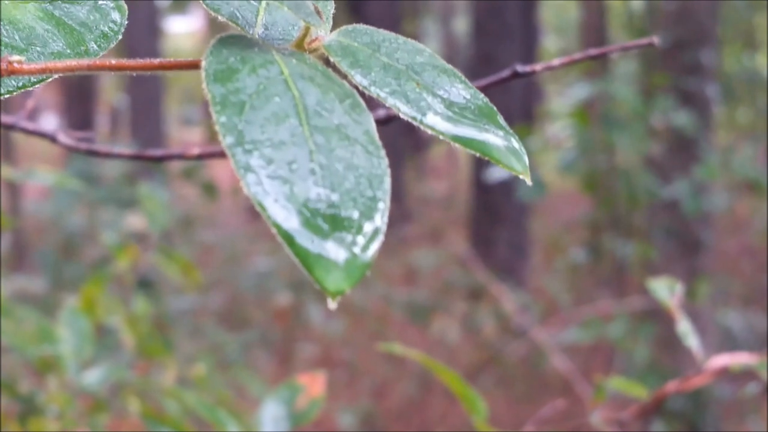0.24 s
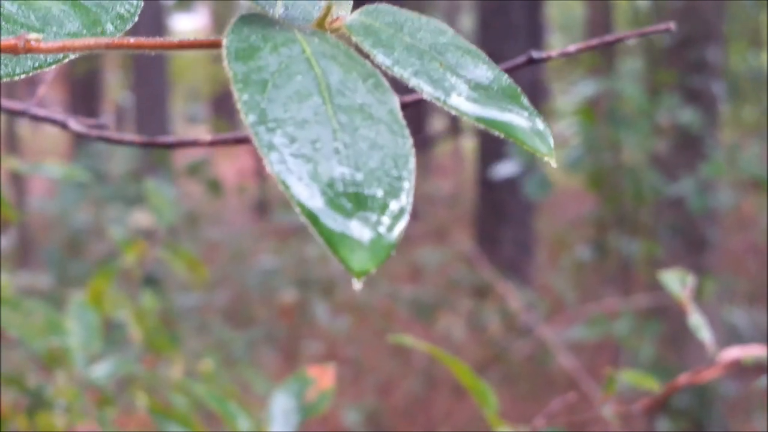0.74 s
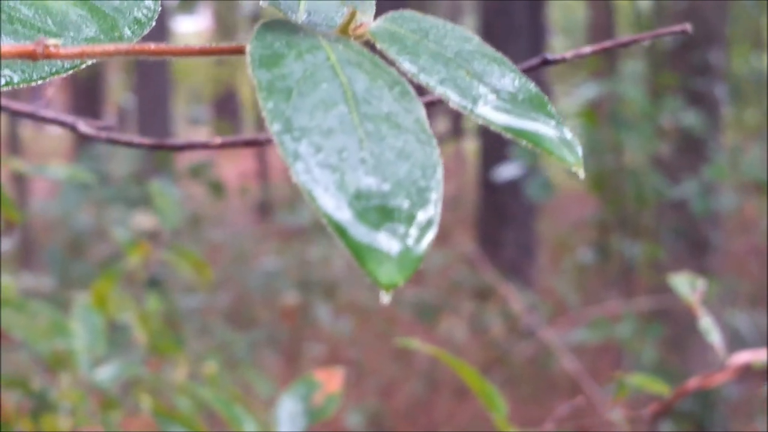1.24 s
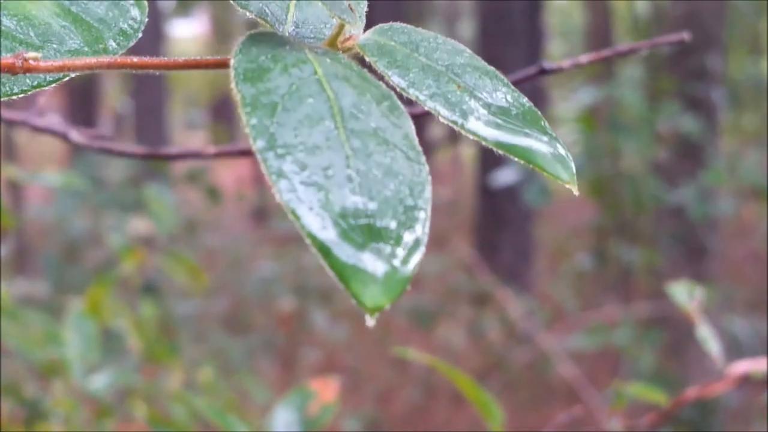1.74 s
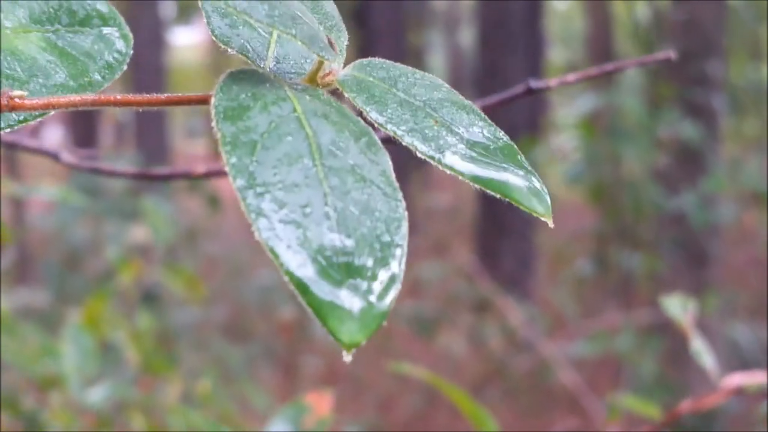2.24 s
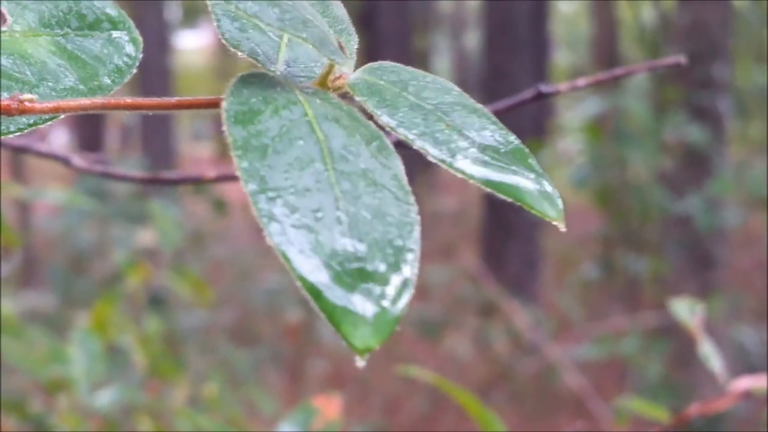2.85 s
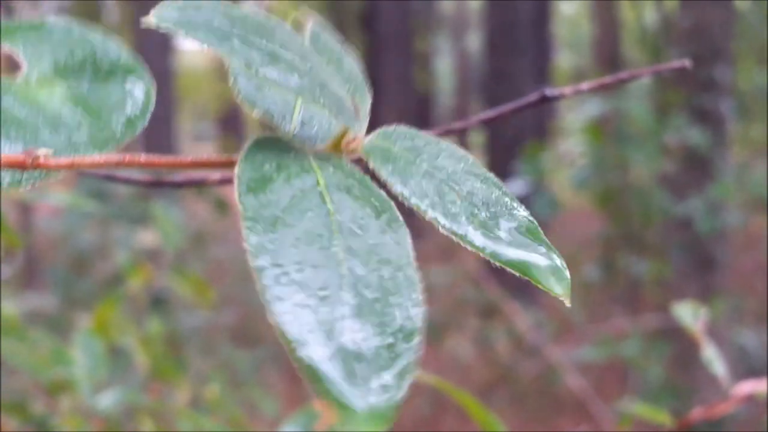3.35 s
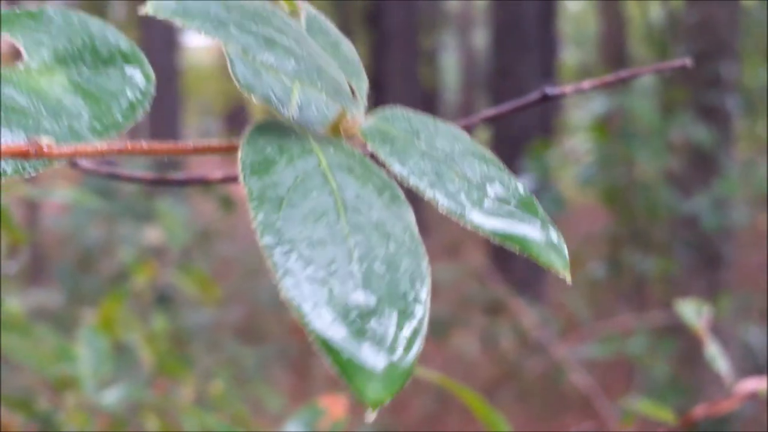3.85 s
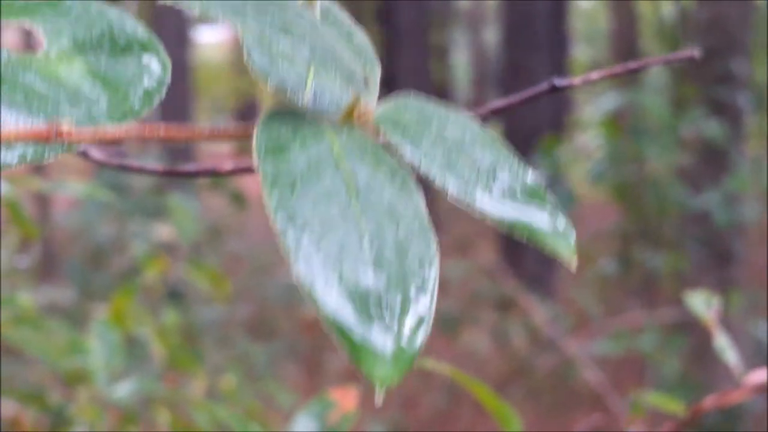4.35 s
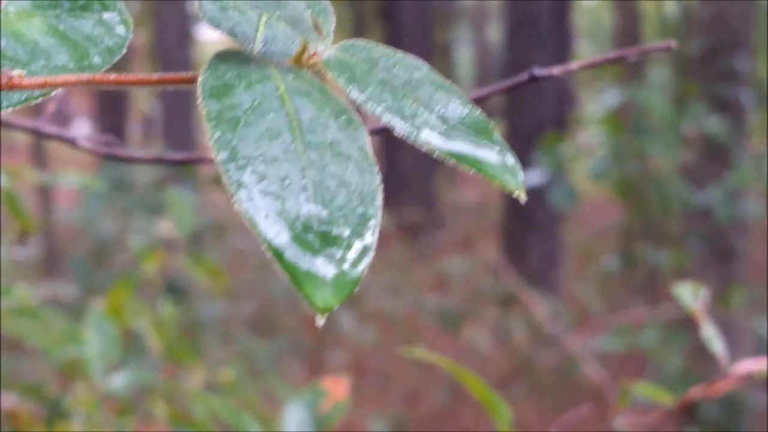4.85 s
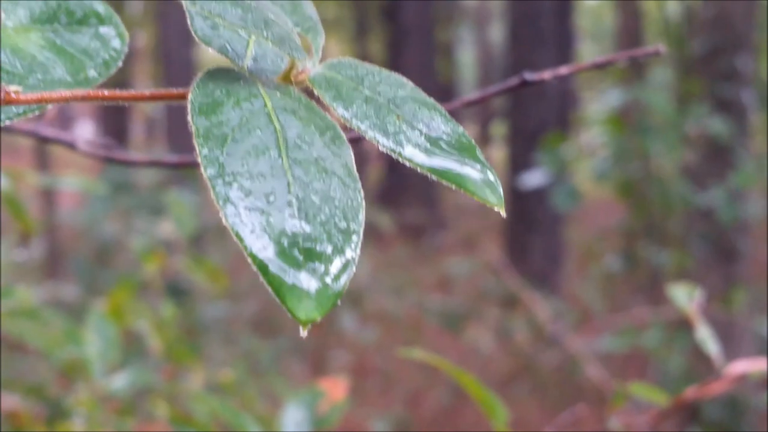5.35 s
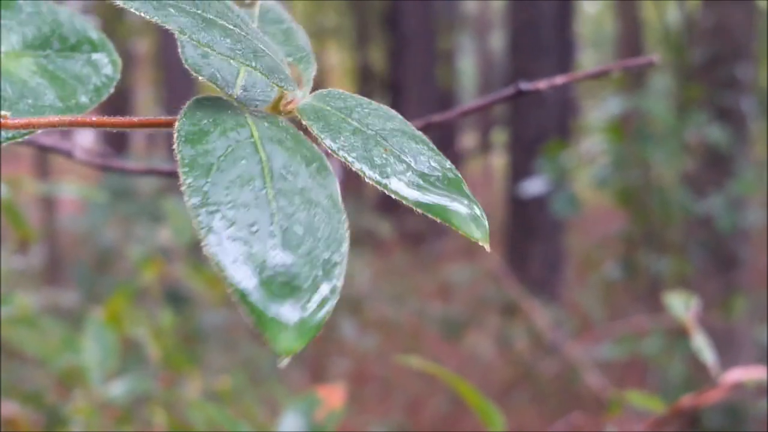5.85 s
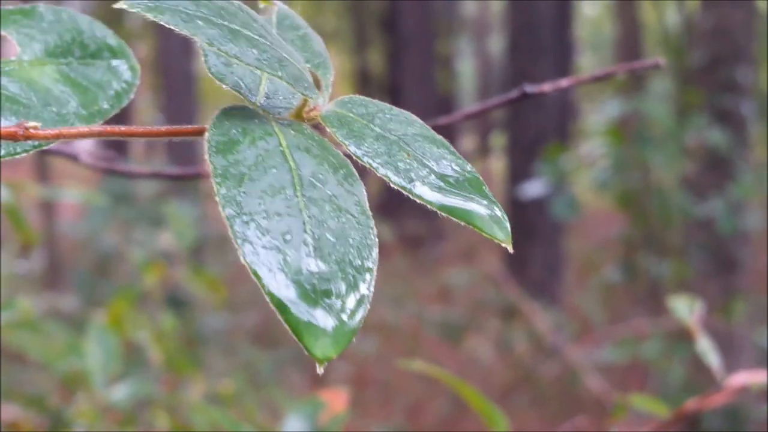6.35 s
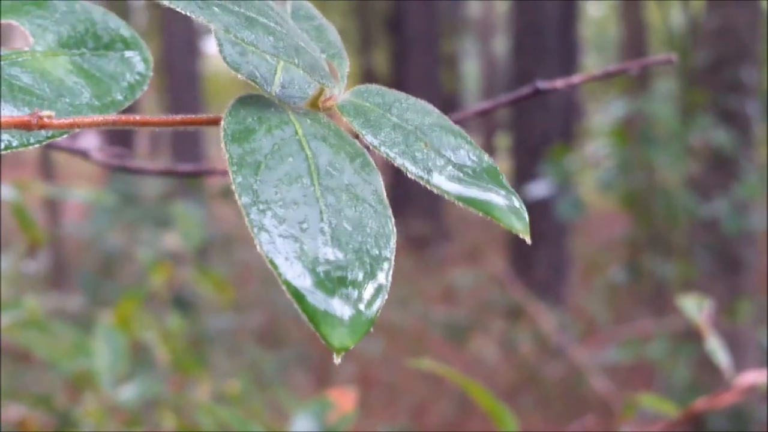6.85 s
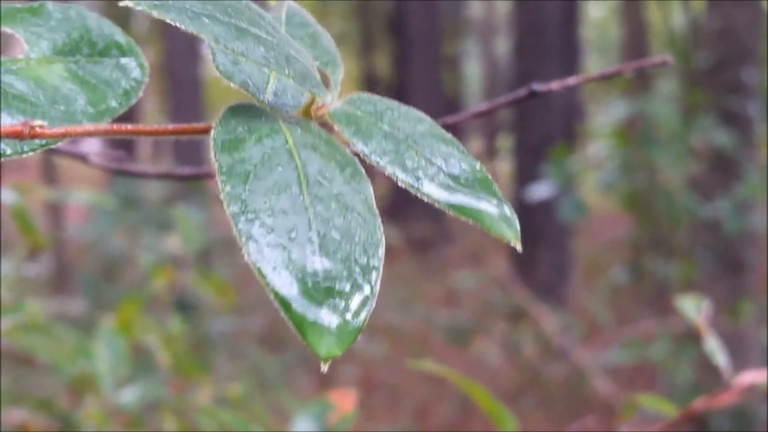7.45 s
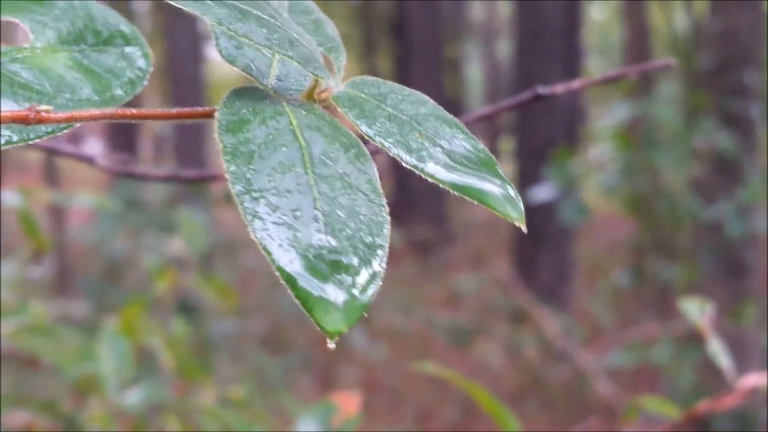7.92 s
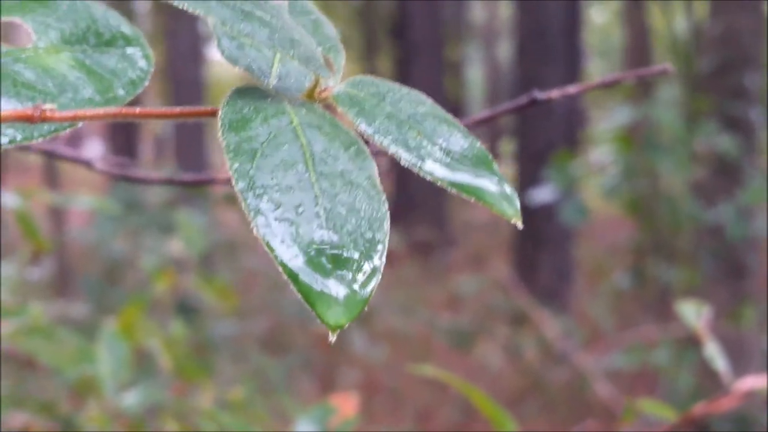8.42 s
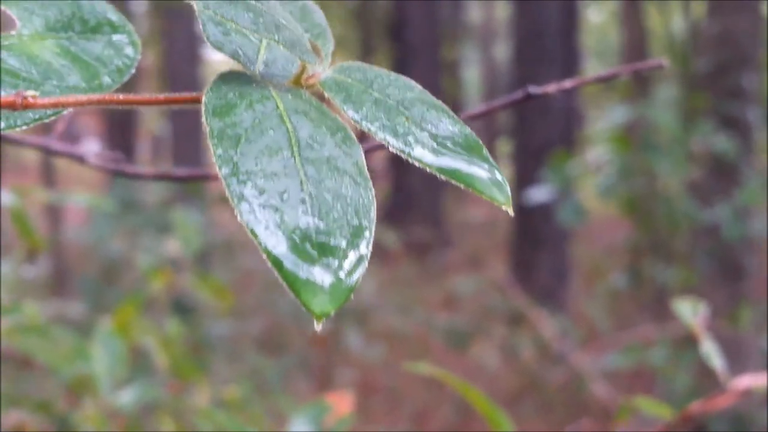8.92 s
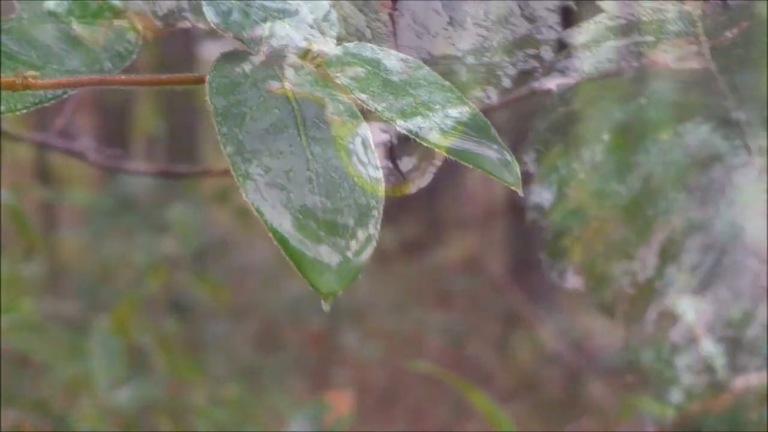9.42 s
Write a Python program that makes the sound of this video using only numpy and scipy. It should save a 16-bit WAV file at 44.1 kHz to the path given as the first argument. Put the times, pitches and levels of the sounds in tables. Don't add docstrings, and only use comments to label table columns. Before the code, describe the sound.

Steady rain in a wood, heard in stereo from among wet leaves. A diffuse hiss over a low, soft rumble surrounds dense small patter, slowly thinning throughout. From the start, close drips tap, slap and snap irregularly, with a hard leaf blow at 0.5 s and a busy cluster until about 1.7 s. On the left a small bird chips at 0.5 s, then whistles rapid phrases that climb, plunge and slide down until 2 s, echoing among trunks. Softer hollow drips land at 2.3 and 2.6 s, with tiny bright ticks and a small watery plink around 2.4 to 3.4 s. A big, longer-ringing knock comes at 4.3 s and another at 5.4 s. The bird sings three brisk phrases from 5.5 to 7 s. Drips grow sparse and lighter; at 8.5 s a soft leaf thud and clear plink precede one faint bird phrase. Last light drips tap near 9.65 s.

```python
import sys
import numpy as np
from scipy import signal
from scipy.fft import rfft, irfft
from scipy.io import wavfile
from scipy.ndimage import uniform_filter1d

SR = 44100
rng = np.random.default_rng(int(sys.argv[2]) if len(sys.argv) > 2 else 0)


def output_pcm(signal):
    pcm = np.clip(np.atleast_2d(signal).T, -1, 1) * 32767
    wavfile.write(sys.argv[1], SR, np.round(pcm).astype(np.int16))


def nominal_scale(level):
    x = np.asarray(level, float) / 20
    return 10 ** x


N = 426888


def read(points, hz):
    f, value = np.transpose(points)
    return np.interp(np.log(hz + 1), np.log(f + 1), value)


def evened(x):
    return x / np.sqrt(np.mean(x ** 2) + 1e-20)


def add(mix, at, sound):
    part = mix[:, at:][:, :sound.shape[1]]
    part += sound[:, :part.shape[1]]


def leaned(db):
    return np.array([db / 2, -db / 2])


# time [s], rain strength [dB].
RAIN_STRENGTH = [(0.0, -53.5), (0.24, -57), (9.68, -63.5)]


def strength(t):
    db = np.interp(t, *np.transpose(RAIN_STRENGTH))
    return nominal_scale(db - db.mean())


# frequency [Hz], level per Hz [dB].
WASH_SPECTRUM = [(12, 3.5), (20, -8.5), (70, 0), (162, -12.5), (233, -14), (344, -15), (385, -12),
                 (1280, -13.5), (1990, -8.5), (3890, -16.5), (6250, -16.5), (7820, -29), (15700, -26.5)]
# frequency [Hz], likeness [-1 to 1].
WASH_LIKENESS = [(25, 0.91), (60, 0.96), (240, 0.79), (950, -0.11), (3770, 0.0088), (15000, 0.024)]
# frequency [Hz], left minus right [dB].
WASH_LEAN = [(60, 0.5), (180, 1), (550, -1), (1650, 5), (4970, -4.5), (8000, -3.5), (15000, -0.5)]
WASH_DB = -49.5


def wash():
    frames, hz = N // 128 + 9, np.fft.rfftfreq(512, 1 / SR)
    a, b, c, d, patches = rng.standard_normal((frames, 257, 5)).T
    patches = evened(uniform_filter1d(uniform_filter1d(patches, size=8, axis=0), size=12, axis=1))
    flicker = rng.standard_normal((frames, 257)).T
    flicker = evened(uniform_filter1d(flicker, size=90, axis=0))
    unsteady_db = (0.9 * patches + 1.4 * flicker) * (hz > 200)[:, None]
    spectra = np.array([a + 1j * b, c + 1j * d]) * nominal_scale(unsteady_db)
    noise = signal.istft(spectra, nperseg=512, noverlap=384)[1][:, :N]
    left, other = rfft(noise * strength(np.arange(N) / SR) ** 0.22)

    hz = np.fft.rfftfreq(N, 1 / SR)
    same = np.clip(read(WASH_LIKENESS, hz), -1, 1)
    right = same * left + np.sqrt(1 - same ** 2) * other
    pair = np.array([left, right]) * nominal_scale(leaned(read(WASH_LEAN, hz)))
    return nominal_scale(WASH_DB) * evened(irfft(pair * nominal_scale(read(WASH_SPECTRUM, hz)), N))


def trunks(x, t60, gap):
    at = np.arange(0, SR // 2, 20)
    at = at + rng.integers(0, 20, (2, len(at)))
    taps = np.zeros((2, SR // 2 + 20))
    np.put_along_axis(taps, at, rng.standard_normal(at.shape), axis=1)
    t = np.arange(taps.shape[1]) / SR
    taps *= nominal_scale(-60 * t / t60) * np.clip(t / gap, 0, 1)
    return signal.fftconvolve(x, taps / np.linalg.norm(taps[0]), axes=1)[:, :N]


def splashes(count, likeness):
    noise = rng.standard_normal((count, 3, 1000))
    return likeness * noise[:, :1] + np.sqrt(1 - likeness ** 2) * noise[:, 1:]


# low edge [Hz], high edge [Hz], fade [s per ms of splatter],
# splatter against blow [ratio], share of the drip's side [ratio], lean left minus right [dB], trim [dB].
DRIP_PARTS = [
    (120, 343, 0.002, 0.33, .03, -1, -2.5),
    (458, 1400, 0.0013, 0.65, 0.067, -4, 0.36),
    (1580, 3340, 0.0025, 1.17, 0.13, 9, -2.5),
    (3540, 9100, 0.0035, 1.06, 0.17, -14.5, -0.5),
]
# frequency [Hz], left minus right [dB].
NEAR_LEAN = [(1100, 3), (2300, 14), (3500, 6.5), (4500, -9), (7000, -15), (14000, 21.5)]


def drip(levels_db, side_db, spread, luck, splash, size=2048):
    t = np.arange(splash.shape[1]) / SR
    hz = np.fft.rfftfreq(size, 1 / SR) + 1
    dip = 1 - 0.75 * np.exp(-((hz - 8200) / 1400) ** 2)
    colour, waves = 1e-9, 0
    for db, chance, part in zip(levels_db, luck, DRIP_PARTS):
        lo_hz, hi_hz, fade, share, sided, lean_db, trim_db = part
        fade = fade * np.clip(spread, 0.5, 4)
        push = np.clip(share, 0, 2.5) * splash * np.exp(-t / fade) / np.sqrt(fade * SR / 2)
        push[:, 2] += 1
        f = hz * (0.65 + 0.043 * chance)
        band = dip / np.sqrt((1 + (lo_hz / f) ** 4) * (1 + (f / hi_hz) ** 11))
        tilt_db = leaned(sided * side_db + lean_db + read(NEAR_LEAN, hz))
        band = band / band.mean() * nominal_scale(db + trim_db + tilt_db)
        wave = band * rfft(push, size)
        colour = colour + band
        waves = waves + wave * np.hypot(1, share) * np.linalg.norm(band) / np.linalg.norm(wave)

    n = np.arange(size)
    fold = irfft(np.log(colour)) * np.sign(size / 2 - n) * (n > 0)
    left, right = irfft(waves * np.exp(1j * rfft(fold).imag))[:, :len(t)]
    lag = round(6 * (luck[5] - 0.6))
    return np.array([np.pad(left, (12 + lag, 12 - lag)), np.pad(right, (12 - lag, 12 + lag))])


# drops per second, level [dB], size spread [dB],
# mean thump [dB], mean slap [dB], mean snap [dB], mean tick [dB].
SMALL_DROPS = [
    (80, -50, 2.3, -13, -5, 0.1, -6),
    (400, -58, 3, -14, -6, 0.1, -8),
]


def patter(count=16):
    out, rate = np.zeros((2, N)), strength(np.arange(N) / SR) / SR
    for per_s, db, spread_db, *colour_db in SMALL_DROPS:
        size_db = db + spread_db * np.minimum(rng.exponential(1, N), 2.5)
        size = nominal_scale(size_db) * (rng.random(N) < per_s * rate)
        leaf = rng.integers(0, count, N)
        luck, noise = rng.random((count, 11)), splashes(count=count, likeness=0.75)
        for k in range(count):
            levels_db = colour_db + 14 * (luck[k, 6:10] - 0.5)
            side_db = 16 * (luck[k, 10] - 0.5)
            tap = (-1) ** k * drip(levels_db, side_db, 0.5 + luck[k, 4], luck[k], noise[k])
            hits = size * (leaf == k)
            out += signal.oaconvolve(hits[None], tap, axes=1)[:, :N]
    return out


# start [s], thump [dB], slap [dB], snap [dB], tick [dB].
HEAVY_DRIPS = [(0.363, -41, -34.5, -37, -47), (0.489, -37, -21, -22, -30), (0.63, -56, -31.5, -34, -46),
               (0.687, -30, -20, -35, -38), (0.937, -64, -29, -33, -50), (1.412, -39, -19.5, -37, -35),
               (1.8278, -64, -36, -28, -52), (2.274, -40, -30, -27.5, -31), (2.7986, -70, -35, -33, -57),
               (3.0226, -46, -24.5, -31, -61), (4.305, -42, -25, -30, -30), (4.347, -50, -26, -39, -55),
               (4.458, -71, -52, -41, -39), (4.5645, -58, -31, -42, -45), (5.419, -20.5, -39, -28, -38),
               (5.7173, -36, -21, -31, -39)]
# start [s], thump, slap, snap and tick [dB].
SPLATTERING_DRIPS = [(0.7032, -36, -28, -46, -46), (0.887, -61, -25, -35, -38), (0.895, -41, -37, -33, -45),
                     (1.087, -61, -31, -34, -55), (1.0994, -59, -28, -32, -47), (1.451, -43, -29, -36, -47),
                     (1.5745, -44, -37, -35, -56), (1.666, -65, -29.5, -32, -39),
                     (2.624, -34, -44, -25.5, -36), (3.5054, -38.5, -34, -26, -36.5),
                     (4.5596, -49, -39, -35, -48), (5.6472, -34, -35, -46, -47),
                     (5.9413, -43, -34, -40, -47), (6.384, -55, -31.5, -52, -54),
                     (7.781, -66, -26, -49, -50), (8.469, -36, -47, -27.5, -33),
                     (8.542, -54, -62, -32, -43)]
# start [s], snap [dB], brightness as tick minus snap [dB].
LIGHT_DRIPS = [(0.314, -34.5, -12), (0.425, -39, -21), (0.4472, -39, -22), (0.74, -34, -12),
               (0.821, -38, -16), (0.925, -37, -9), (1.006, -35, -5), (1.011, -41, -10),
               (1.1938, -36.5, -15), (1.5465, -34, -12), (2.254, -38, -19), (2.8485, -39, -10),
               (3.0556, -43, -7), (3.3243, -40, -5), (3.3927, -37.5, -3), (4.068, -46, -14),
               (5.4675, -38, -3), (5.561, -40, -17), (5.69, -35, -10), (6.22, -35, -10), (7.081, -40.5, -13),
               (3.037, -38, -10), (0.506, -36, -12), (8.0035, -44.5, -19), (8.065, -38.5, -13),
               (8.0707, -39, -7), (8.096, -41, -2), (3.43, -40, -11), (9.097, -42, -9), (5.296, -44, 4),
               (5.2615, -55, 5), (7.517, -52, -9), (9.268, -41, -5),
               (5.171, -44.5, -14), (0.916, -37.5, -1), (1.598, -35.5, -4), (1.915, -41, 1),
                (2.321, -34.5, -3), (2.433, -45.5, 9), (2.7447, -45, 7), (2.787, -44, 3), (2.8654, -42, -1),
                (3.223, -38, 0), (3.25, -45, 6), (3.2936, -44, 2), (3.3754, -38.5, -11), (6.946, -38, -3.5),
                (4.4134, -51, 11), (4.6051, -41, 2), (4.785, -39.5, -3), (5.817, -41, -5), (6.533, -40, -4),
                (6.5837, -41, -2), (6.895, -40, 0), (7.1602, -44, 1), (7.267, -39.5, -8), (7.214, -40, -8),
                (7.698, -40.5, -4), (8.11, -37, -1), (8.3173, -44, 0), (8.712, -44, 1), (9.6354, -35, -4),
                (9.6682, -38.5, 1)]


def drips():
    rows = [(*row, 0.95) for row in HEAVY_DRIPS]
    rows += [(*row, 2.5) for row in SPLATTERING_DRIPS]
    for s, db, bright_db in LIGHT_DRIPS:
        thump_db = db - 12.5 - 0.23 * (bright_db + 6)
        slap_db = db - 0.5 - 0.49 * (bright_db + 6)
        rows.append((s, thump_db, slap_db, db, db + bright_db, 1))
    out, luck = np.zeros((2, N)), rng.random((len(rows), 6))
    splash = splashes(count=len(rows), likeness=1.0)
    for (s, *levels_db, spread), chance, noise in zip(rows, luck, splash):
        sound = drip(levels_db, 8 * (chance[4] - 0.5), spread, chance, noise)
        add(out, max(round(s * SR) - 4, 0), sound)
    return out


# start [s], level [dB], pitch [Hz].
POOL_DROPS = [
    (2.434, -34, 2650),
    (3.2, -41, 2300),
    (8.542, -31.5, 2700),
]


def pings(t60=0.011):
    out, t = np.zeros((2, N)), np.arange(0, 2 * t60, 1 / SR)
    for s, db, hz in POOL_DROPS:
        side_db = (3500 - hz) / 350 * np.array([[1], [-1]])
        ring = np.sin(2 * np.pi * hz * t) * np.minimum(t / 0.00023, 1)
        add(out, round(s * SR), nominal_scale(db - 60 * t / t60 + side_db) * ring)
    return out


# start [s], peak [dB], left minus right [dB].
BURSTS = [(2.7432, -44, -2.0), (3.218, -45, 0.5), (3.2505, -34, 6), (3.2929, -48, -2.5), (3.3752, -36, 6),
          (3.4007, -49, 1.0), (4.1169, -44, 1.0), (4.2892, -32, 1), (4.4119, -43, -2.0),
          (4.6052, -46, -3.0), (5.8166, -41, 6), (6.945, -45, -1.0), (7.1591, -46, -2), (8.11, -41, -0.5),
          (8.9984, -44, 2.0), (.5975, -47, -1), (.7996, -43, -2.5), (3.472, -46, -.5), (3.7918, -47, 0),
          (4.1894, -49, -2), (7.2005, -47, -2), (8.4946, -44, 0), (8.541, -46, -3), (8.9221, -49, -.5)]
BURST_BAND = (9000, 19500)
# start [s], peak [dB], left minus right [dB].
WAXY_SNAPS = [(0.0293, -30.5, -10), (0.9243, -31, -2.0), (2.8644, -38, -5.5), (3.2654, -44, -6.5),
              (3.3827, -45, -3.5), (4.4578, -36, -9.0), (4.559, -36, -7), (4.7845, -44, -7.0),
              (5.1327, -48, -7.5), (5.888, -39, 5.0), (6.5334, -46, -3.0), (7.266, -34, -8),
              (7.6784, -37, -5.0), (7.8564, -48, -4.0), (8.541, -38, -9)]
SNAP_BAND = (3900, 6800)


def sparks():
    out, t = np.zeros((2, N)), np.arange(300) / SR
    kinds = ((BURSTS, BURST_BAND, 0.00038, 3), (WAXY_SNAPS, SNAP_BAND, 0.0005, -1.5))
    for rows, band_hz, fade_s, trim_db in kinds:
        band = signal.butter(2, band_hz, "band", fs=SR)
        for (s, db, lean_db), noise in zip(rows, rng.standard_normal((len(rows), 300))):
            burst = signal.lfilter(*band, (noise + 6 * (t == 0)) * np.exp(-t / fade_s))
            gain = nominal_scale(db + trim_db + leaned(lean_db))[:, None]
            add(out, round(s * SR) + 30, gain * burst / abs(burst).max())
    return out


# start [s], peak [dB], rise [ms], lag of the left side [samples].
LARGEST_DRIPS = [
    (0.4876, -5.5, 0.083, 3),
    (2.2743, -19, 0.32, -5),
    (2.6251, -19.5, 1, -5),
    (4.3029, -6, 0.09, 2.5),
    (5.4194, -8, 0.094, -3),
    (8.4693, -19, 0.11, -5),
    (4.5649, -24, 0.091, -2),
]
# resonance [Hz], width [Hz], level [dB].
LEAF_MODES = [
    [(292, 310, 0), (616, 470, -11.5), (1075, 130, -13), (1646, 240, -8), (2160, 150, -18.5),
     (2520, 140, -19), (3040, 200, -15), (3220, 140, -9.5), (4500, 420, -31)],
    [(280, 400, 1.5), (555, 310, -6), (920, 410, -7.5), (1670, 130, -6), (2150, 130, -4), (3200, 260, -10),
     (4130, 250, -13), (4700, 260, -14), (5320, 180, -17)],
    [(288, 200, -3.5), (520, 99, -10), (936, 190, -4.5), (1880, 160, -2), (2210, 170, -7), (2620, 140, -6),
     (3000, 190, -2), (3830, 480, -9), (6100, 500, -9.5)],
    [(270, 23, 4.5), (490, 140, 3.5), (814, 320, -2.5), (1160, 390, 6.5), (1770, 120, 5.5), (2170, 350, 5),
     (2800, 120, -1), (3720, 150, -22), (4280, 380, -22)],
    [(274, 38, -3), (726, 150, -4), (1160, 1000, 2.5), (2040, 140, -4.5), (2850, 310, -3.5),
     (3530, 250, -14), (4100, 370, -13), (4960, 260, -13.5)],
    [(263, 150, -6), (493, 210, -13), (686, 170, -3.5), (1200, 220, -3), (1740, 200, -7), (2560, 200, -24),
     (3140, 350, -5.5), (3900, 180, -25), (5000, 320, -26)],
    [(510, 160, -16), (1070, 140, 2), (1420, 160, -2), (1980, 150, -2), (2680, 100, -15), (3050, 370, -5)],
]
# frequency [Hz], left minus right [dB].
RING_LEAN = [(900, -0.5), (1400, 5), (2300, 17.5), (3300, 0.5), (4500, -14.5)]


def blows():
    out, t = np.zeros((2, N)), np.arange(2000) / SR
    for (s, db, rise_ms, lag), leaf in zip(LARGEST_DRIPS, LEAF_MODES):
        hz, width, mode_db = np.transpose(leaf)[:, :, None]
        fade = np.exp(-np.pi * width * t) * (1 - np.exp(-t * 1000 / rise_ms))
        rings = nominal_scale(mode_db) * width * fade * np.sin(2 * np.pi * hz * t)
        lean = nominal_scale(read(RING_LEAN, hz) / 2)
        left = np.pad((rings * lean).sum(0), (10 + round(lag), 10 - round(lag)))
        right = np.pad((rings / lean).sum(0), 10)
        peak = abs(rings.sum(0)).max()
        add(out, round(s * SR) - 10, nominal_scale(db) * np.array([left, right]) / peak)
    return signal.lfilter(*signal.butter(2, 180, "high", fs=SR), out)


def hook(points):
    start, length = points[0][0], points[-1][0] - points[0][0]
    shape = [((s - start) / length, db, khz) for s, db, khz in points]
    return shape, [(start, length, 0.1, 1000, 1)]


# place in the note [0-1], level [dB], pitch [ratio].
CHIP_SHAPE = [(0, -12, .81), (.39, -1, 1), (.75, -3.5, 1), (1, -20, 1)]
LEAD_SHAPE = [(0, -10, .79), (.4, 2, .83), (.7, -5, .9), (.82, -13, 0.98), (.94, -4, 0.95), (1, -10, 1)]
HOLD_SHAPE = [(0, -15, .77), (.11, -5, .99), (.28, -4, .995), (.45, 0, 1), (.8, -4, 1), (1, -12, .995)]
RISE_SHAPE = [(0, -16, .86), (.3, -9, .895), (.5, -13, .935), (.6, -3, .97), (.76, 0, 1), (.92, -3, 1.01),
              (1, -16, 1.01)]
TOP_SHAPE = [(0, -9, .89), (.3, -3, .955), (.6, 0, .993), (.8, -3, 1), (1, -14, 1)]
SLIDE_SHAPE = [(0, -18, 1.1), (.15, -11, 1.085), (.4, 0, 1.05), (.54, -5, 1.02), (.74, -5, 1),
               (1, -13, .99)]
DROP_SHAPE = [(0, -18, 1.11), (.22, -4, 1.04), (.42, 0, 1), (.7, -5, .99), (1, -13, .99)]
FALL_SHAPE = [(0, -9, 1.12), (.2, 0, 1.02), (.36, -9, .94), (.55, -18, .87), (.8, -13, .82), (1, -17, .8)]
# start [s], length [s], level [dB], pitch [Hz], depth of glide [ratio].
CHIP_NOTES = [(0.515, 0.0443, -36, 2850, 1)]
LEAD_NOTES = [(.712, 0.094, -39.5, 2634, 1)]
HOLD_NOTES = [(.853, 0.084, -35.5, 3487, 0.93)]
RISE_NOTES = [(1.197, 0.065, -33, 2620, 1.3), (1.623, 0.06, -32, 2610, 0.6),
              (5.804, 0.061, -32, 2553, 0.98), (6.221, 0.0566, -29, 2570, 0.91),
              (6.648, 0.065, -30, 2582, 0.93)]
TOP_NOTES = [(1.355, 0.022, -39.5, 4770, .3), (1.778, .034, -43.5, 4975, -0.37),
             (5.533, 0.02, -37.5, 5270, 1.2), (5.96, .028, -40.5, 5240, .7),
             (6.375, 0.0246, -37, 5110, 1.03), (6.81, .024, -47.5, 5080, .5),
             (8.666, .028, -42.5, 5350, 1.4)]
SLIDE_NOTES = [(.978, 0.064, -32.5, 2714, 1), (1.412, 0.061, -32.5, 2693, 0.43),
               (1.841, 0.061, -31, 2710, 0.31), (5.591, 0.045, -31, 2703, 1.06),
               (6.021, 0.042, -28.5, 2736, 1.1), (6.431, 0.043, -28.5, 2674, 1),
               (6.87, 0.042, -29, 2774, 1.12), (8.722, 0.056, -36.5, 2780, 0.53)]
DROP_NOTES = [(1.046, 0.042, -36, 3090, 1.16), (1.473, 0.028, -31.5, 3155, 1.06),
              (1.902, 0.022, -29.5, 3220, 1.03), (5.649, 0.027, -35.5, 3156, 1.14),
              (6.082, 0.028, -31, 3197, 0.74), (6.49, 0.03, -28.5, 3200, 1), (6.931, 0.023, -33, 3200, 1.3),
              (8.784, 0.02, -34.5, 3260, .45)]
FALL_NOTES = [(1.096, 0.084, -40.5, 2200, 1.1), (1.521, 0.072, -39, 2100, 0.99),
              (1.95, 0.064, -38.5, 2175, 1), (5.697, 0.065, -41, 2180, 0.31),
              (6.127, 0.055, -36, 2150, 0.92), (6.547, .06, -37.5, 2150, 1.15),
              (6.982, 0.065, -41.5, 2075, 0.4), (8.828, 0.09, -45.5, 2330, 1.4)]
# time [s], level [dB], pitch [kHz].
HOOK_CURVES = [
    [(1.292, -52, 3.78), (1.303, -50, 3.85), (1.309, -36, 4.08), (1.318, -38, 4.04), (1.329, -31, 3.38),
     (1.336, -33, 3.18), (1.346, -42, 3.16)],
    [(1.717, -52, 3.9), (1.723, -39, 4.05), (1.729, -46, 4.25), (1.737, -39, 4.45), (1.749, -35, 3.73),
     (1.758, -32, 3.36), (1.771, -41, 3.33)],
    [(5.482, -52, 4.25), (5.489, -45, 4.32), (5.496, -42, 4.2), (5.505, -37, 3.7), (5.513, -37, 3.36),
     (5.518, -36, 3.28), (5.525, -45, 3.27)],
    [(5.895, -50, 3.95), (5.905, -43, 3.85), (5.914, -38, 4.08), (5.924, -39, 4.07), (5.932, -32, 3.7),
     (5.942, -31, 3.33), (5.957, -39, 3.32)],
    [(6.308, -52, 3.72), (6.315, -42, 3.85), (6.324, -44, 4.07), (6.333, -38, 4.26), (6.344, -36, 3.85),
     (6.355, -33, 3.44), (6.368, -42, 3.45)],
    [(6.744, -48, 3.75), (6.75, -37, 3.8), (6.76, -41, 3.9), (6.767, -39, 4.28), (6.779, -32, 3.55),
     (6.789, -29, 3.31), (6.802, -37, 3.31)],
    [(8.613, -56, 3.8), (8.621, -48, 4.15), (8.629, -43, 4.28), (8.637, -43, 4.12), (8.645, -39, 3.8),
     (8.652, -41, 3.57), (8.66, -48, 3.55)],
]


def bird():
    kinds = [(CHIP_SHAPE, CHIP_NOTES), (LEAD_SHAPE, LEAD_NOTES), (HOLD_SHAPE, HOLD_NOTES),
             (RISE_SHAPE, RISE_NOTES), *map(hook, HOOK_CURVES), (TOP_SHAPE, TOP_NOTES),
             (SLIDE_SHAPE, SLIDE_NOTES), (DROP_SHAPE, DROP_NOTES), (FALL_SHAPE, FALL_NOTES)]
    out, side = np.zeros((2, N)), nominal_scale(np.array([[-1.0], [-5.0]]))
    for shape, notes in kinds:
        place, shape_db, ratio = np.transpose(shape)
        for s, length, db, hz, depth in notes:
            u = np.arange(0, length, 1 / SR) / length
            shake, breath = rng.standard_normal((2, 6000))
            flutter = evened(uniform_filter1d(shake, size=60))[:len(u)]
            bend = uniform_filter1d(np.interp(u, place, ratio - 1), size=120, mode="nearest")
            glide = hz * (1 + depth * bend) * (1 + 0.012 * flutter)
            turn = 2 * np.pi * np.cumsum(glide) / SR
            whistle = np.sin(turn) + nominal_scale(-36) * np.sin(2 * turn)
            level = np.interp(u, place, nominal_scale(shape_db + db + 6.5)) * signal.windows.tukey(len(u), 0.12)
            waver = evened(uniform_filter1d(uniform_filter1d(breath, size=130), size=130))[:len(u)]
            add(out, round(s * SR), level * nominal_scale(1.6 * waver) * whistle * side)
    return np.array([out[0], np.roll(out[1], -16)])


def scene():
    song, near = bird(), drips() + pings()
    sway = 2 * np.pi * 40 * np.arange(N) / SR
    far = sum(trunks(song * w, t60=0.52, gap=0.018) for w in (np.cos(sway), np.sin(sway)))
    far = nominal_scale(-6.5) * signal.lfilter(*signal.butter(1, 1800, "high", fs=SR), far)
    ground = nominal_scale(-9) * trunks(song, t60=0.05, gap=0.002)
    near_echo = nominal_scale(-18.5) * trunks(near, t60=0.057, gap=0.0026)
    rain = near + near_echo + patter() + wash() + sparks()
    big = blows()
    big_echo = nominal_scale(-20) * trunks(big, t60=0.06, gap=0.006)
    return song + ground + far + rain + big + big_echo


def top_cut(x):
    return signal.sosfilt(signal.butter(12, 16970, fs=SR, output="sos"), x)


def band_limited(x, hz):
    taps = signal.firwin(1501, hz, window=("kaiser", 9), fs=SR)
    return signal.oaconvolve(x, taps[None], "same", axes=1)


def record(dry):
    low = band_limited(dry, 15820)
    above = band_limited(dry, 16800) - low
    over = uniform_filter1d(abs(above).mean(0), size=60) / nominal_scale(-64) - 1
    gate = uniform_filter1d(np.clip(over, 0, 1), size=120)
    return top_cut(low + above * gate)


dry = scene()
out = record(dry)
output_pcm(out)
```